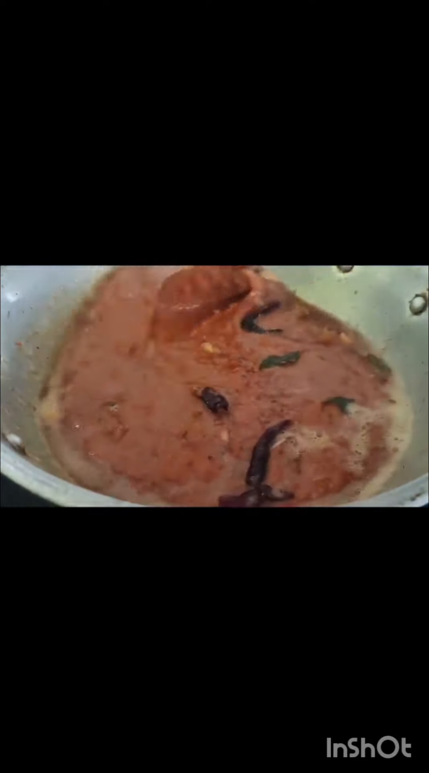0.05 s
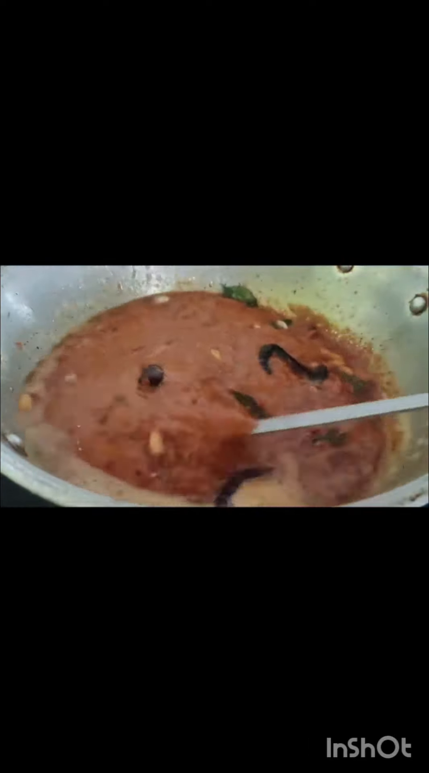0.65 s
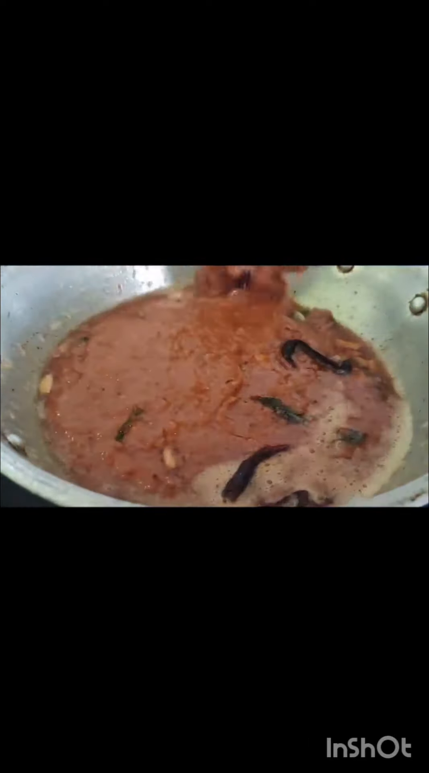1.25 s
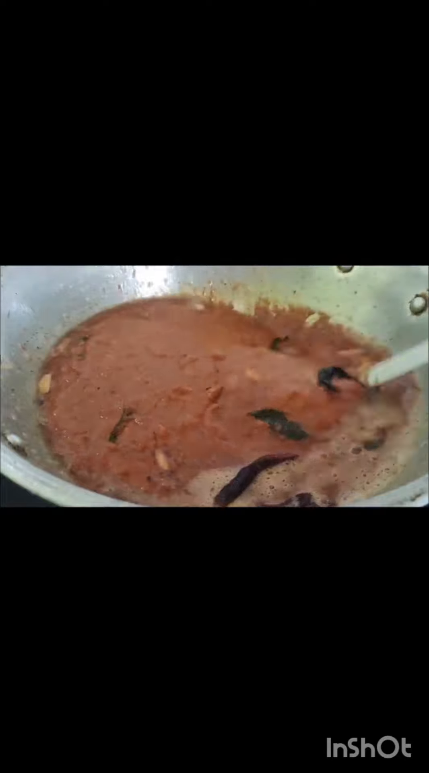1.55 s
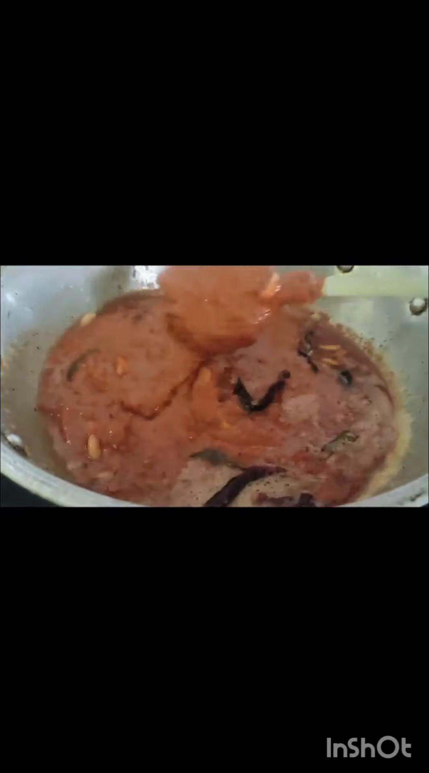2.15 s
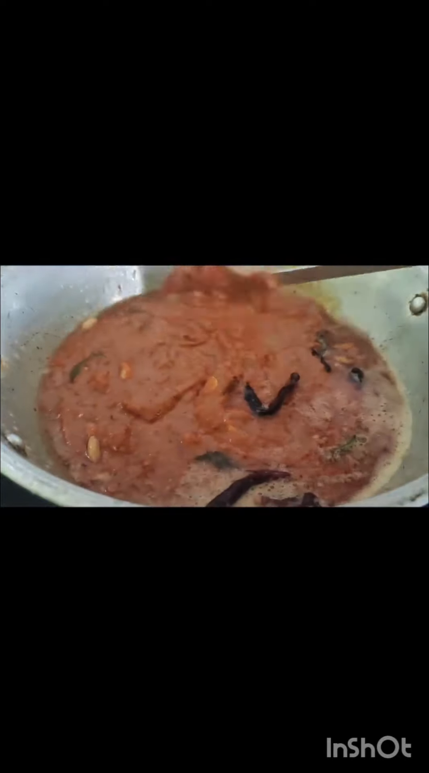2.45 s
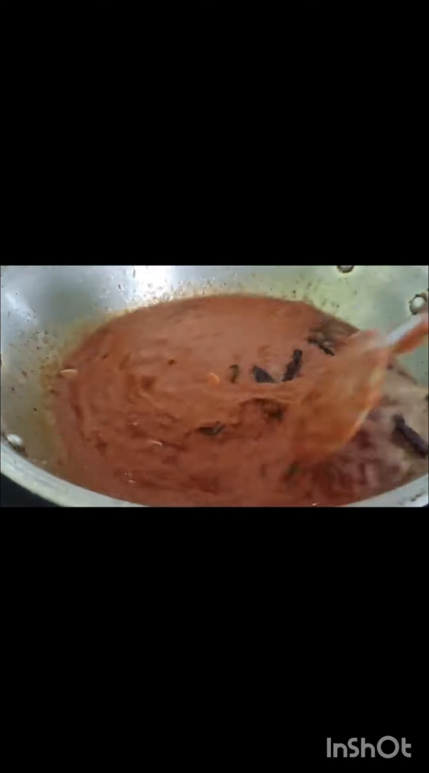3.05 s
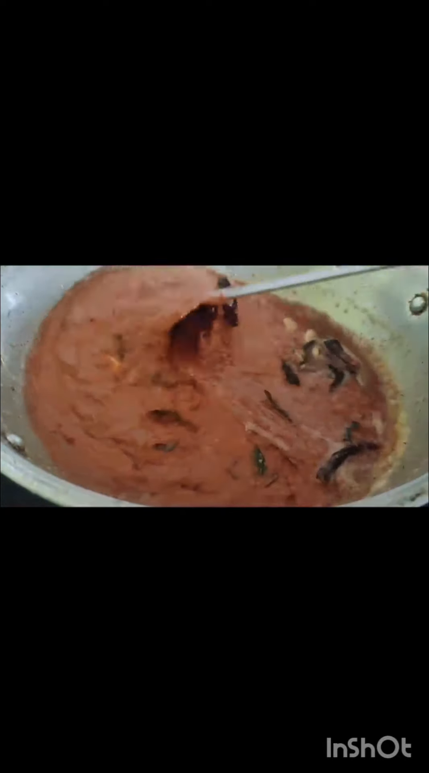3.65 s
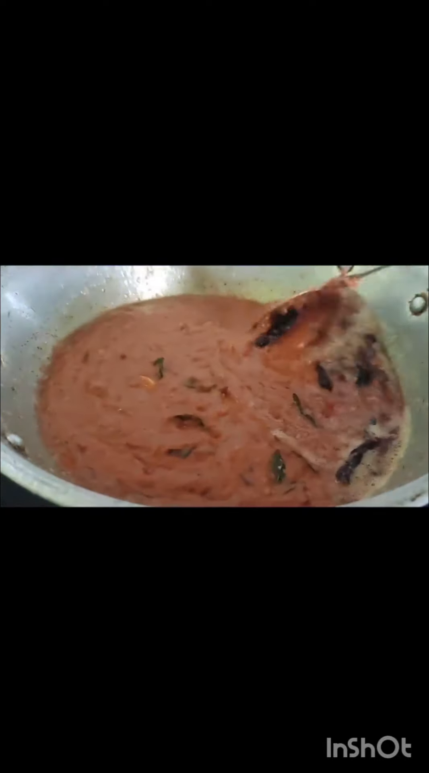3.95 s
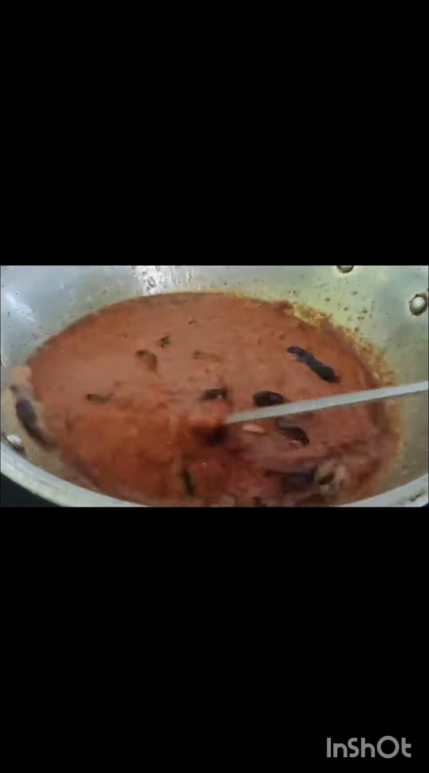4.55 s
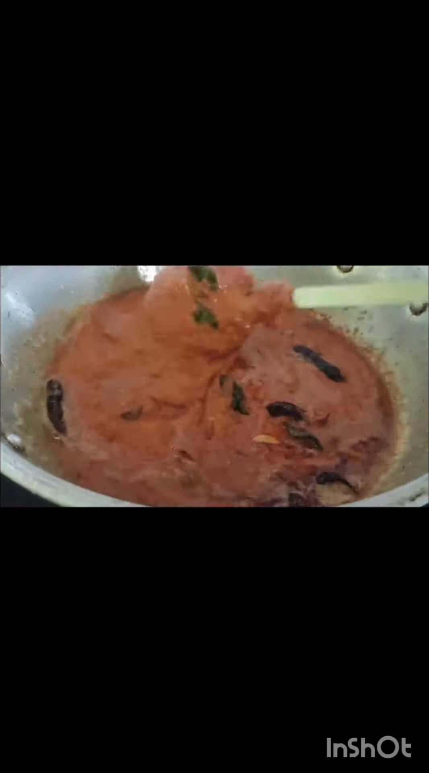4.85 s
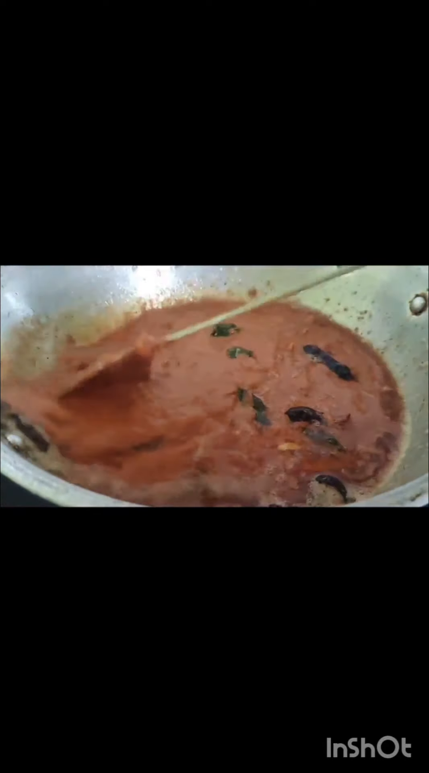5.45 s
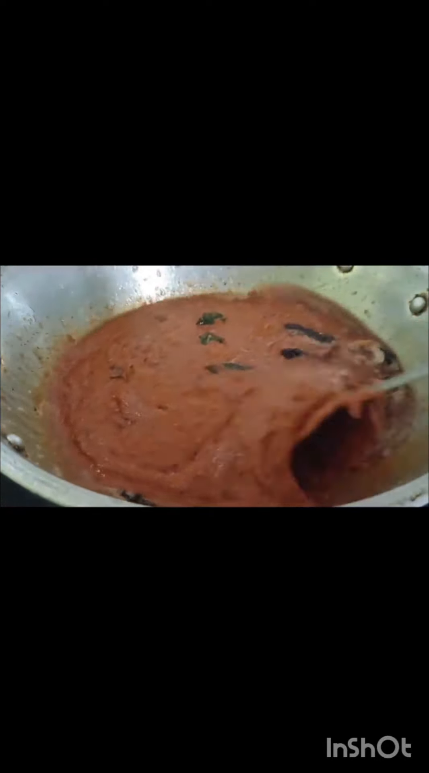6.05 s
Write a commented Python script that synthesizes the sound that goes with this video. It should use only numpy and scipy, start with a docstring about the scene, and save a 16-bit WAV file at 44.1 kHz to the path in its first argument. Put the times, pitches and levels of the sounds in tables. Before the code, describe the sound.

Heard up close in a small, hard-walled kitchen, a metal spatula scrapes and knocks around a pan of thick paste. The first strokes are light and spaced apart. Midway, a bright clink starts a busier run of rasping, bumping and tapping; softer strokes follow, then another sharp clink and scrape. A low, soft stove rush and barely audible bubbling continue throughout.

```python
"""A steel spatula stirs thick paste in a wide metal pan on a stove, in a small kitchen.
The blade scrapes by sticking and slipping; its note falls as it sinks from the bare wall into the paste.
It clinks on bare metal, knocks dully under the paste, and skips over the bottom when pressed hard.
Behind it the stove rushes and hums softly, the paste sizzles faintly and the walls echo the spatula."""
import sys
import numpy as np
from scipy import signal
from scipy.fft import rfft, irfft
from scipy.io import wavfile
from scipy.ndimage import uniform_filter1d

SR = 44100
rng = np.random.default_rng(int(sys.argv[2]) if len(sys.argv) > 2 else 0)


def int16_out(signal):
    """Quantize to a 16-bit WAV file."""
    q = np.round(np.clip(np.atleast_2d(signal).T, -1, 1) * 32767)
    wavfile.write(sys.argv[1], SR, q.astype(np.int16))


N = 277389
TIME = np.arange(N) / SR
TOP_HZ = 14300

# the clear notes of the pan: pitch_hz, level_db, ring_s (time to fade by 60 dB, before damping)
PAN_NOTES = [(274, -14.5, 0.22), (393.4, -5.5, 0.36), (503, -9.5, 0.034), (609, -11.5, 0.31),
             (734, -1, 0.074), (850, -14, 0.042), (1020, 6.5, 0.033), (1190, 4.5, 0.12), (1247, -7, 0.14),
             (1845, -1.5, 0.1), (2094, 3, 0.13), (2453, 0, 0.15), (2620, -2.5, 0.2), (3057, -3.5, 0.21),
             (3700, -1, 0.077), (3830, -12, 0.21), (4730, -9, 0.11), (5230, -10, .11), (6190, -8, 0.088),
             (6720, -1, 0.078), (7370, -4, 0.11), (8780, -15.5, 0.13), (12100, -23, 0.087)]
# the broad resonances of the pan under the paste: pitch_hz, width_hz, level_db
PAN_UNDER_PASTE = [(411, 27, -3), (510.5, 60, 4), (637, 89, 4), (703, 68, 3), (794, 105, 1), (984, 90, 5),
                   (1177, 77, -0.5), (1301, 82, 2), (2100, 42, -8), (2414, 32, -5.5), (3170, 35, -33)]


def scrape():
    """The edge sticks and slips, shaking the pan and the blade, while fine grit hisses."""
    rub, hiss, blade_hz = strokes()
    # the blade rocks as it slides, so its note wobbles, most where it is free of the paste
    wobble = 0.1 * np.clip((blade_hz - 600) / 900, 0.15, 1)
    blade_hz = blade_hz * (1 + wobble * wander(per_s=70))
    judder = wander(per_s=90)
    slips = blend_sides(clicks(per_s=1400, spread_db=1), likeness=0.87) * gain(3.9 * judder)
    pan = normalize(resonances(slips, PAN_UNDER_PASTE)) + gain(9) * normalize(slips)
    # high on the wall the blade sings broadly; deep in the paste it gulps on one low note
    free = even_out(resonate(resonate(pan, blade_hz, width_hz=560), blade_hz, width_hz=800))
    sunk = even_out(resonate(resonate(pan, blade_hz, width_hz=95), blade_hz, width_hz=210))
    depth = np.clip((1000 - blade_hz) / 320, 0, 0.9)
    # some of each slip reaches the pan directly
    direct = even_out(shape_tone(pan, [(200, -16), (380, -8.5), (600, -5), (1350, 2),
                                       (1700, -8), (2900, -20), (4500, -22), (9000, -24)]))
    body = (1 - depth) * free + depth * sunk + gain(-1 - 0.97 * depth) * direct
    return gain(-3.5) * rub * even_out(body, samples=1100) + hiss * grit(judder)


def strokes():
    """Rub, hiss and blade pitch over time: each stroke bites, slides down into the paste and lifts."""
    # strokes of the blade: start_s, length_s, rub_db, rub_change_db, hiss_db, hiss_change_db,
    # landing_hz, sink_s
    moves = [(0, 0.19, -38, -20, -53.5, -10.5, 760, .1), (0.232, 0.048, -30.5, -15.5, -54, 2.5, 860, .2),
             (0.385, 0.35, -48.5, -7, -50, -6.5, 1480, 0.086),
             (1.314, 0.35, -59.5, 4.5, -72.5, 10, 915, .2),
             (1.623, 0.25, -44.5, -8.5, -54, -2, 1660, 0.077),
             (2.444, 0.3, -33, -19, -53, -4.5, 2260, 0.095), (3.03, 0.085, -70, -11, -57.5, -2, 715, .1),
             (3.226, 0.5, -30.5, -8, -39, -13.5, 2280, 0.12), (3.836, 0.17, -39, 5, -53.5, 8, 1480, 0.12),
             (4.062, 0.063, -46, -9.5, -46, -3, 850, 0.12), (4.136, 0.14, -53, 9.5, -53, 0, 2360, 0.31),
             (4.315, 0.07, -39.5, -9.5, -49, -7.5, 1110, 0.33),
             (4.535, 0.023, -56, 4, -54.5, -2, 830, 0.11), (5.15, 0.35, -39, -5.5, -50.5, -2.5, 2020, 0.12),
             (6.011, 0.25, -25.5, -6.5, -38, -4.5, 2060, 0.093)]
    bite_s, sunk_hz = 0.011, 697.0
    rub_fade_db_per_s, hiss_fade_db_per_s = 182, 213
    rub, hiss, blade_hz = np.zeros(N), np.zeros(N), np.full(N, sunk_hz)
    for start_s, length_s, rub_db, rub_change_db, hiss_db, hiss_change_db, landing_hz, sink_s in moves:
        t = np.maximum(TIME - start_s, 0)
        bite = np.minimum(t / bite_s, 1)
        progress = np.minimum(t / length_s, 1)
        lifted_s = np.maximum(t - length_s, 0)
        # paste weighs the blade down: its pitch lingers, then falls to one low note
        pitch_hz = sunk_hz + (landing_hz - sunk_hz) * np.exp(-(t / sink_s) ** 2.08)
        # the higher the blade rings on the bare wall, the less it shakes the pan
        height_db = -2 * np.log2(pitch_hz / sunk_hz)
        rub += bite * gain(rub_db + height_db + rub_change_db * progress - rub_fade_db_per_s * lifted_s)
        hiss += bite * gain(hiss_db + hiss_change_db * progress - hiss_fade_db_per_s * lifted_s)
        blade_hz = np.where(TIME >= start_s, pitch_hz, blade_hz)
    return rub, hiss, blade_hz


def grit(judder):
    """Thousands of tiny slips of the edge make a hiss with a faint ring of metal."""
    # tone of the hiss: pitch_hz, level_db
    hiss_tone = [(300, -70), (900, 1), (2000, 1.5), (3200, -2), (3900, -1.5), (5000, -2), (6200, -1.5),
                 (7600, 0), (8600, -4), (9600, -10), (12000, -9), (14000, -12.5)]
    grains = blend_sides(clicks(per_s=3500, spread_db=-1.5), likeness=0.055)
    metal = resonances(grains, [(hz, 60, db) for hz, db, _ in PAN_NOTES if 1800 < hz < 3200])
    hiss = normalize(shape_tone(grains, hiss_tone)) + gain(-17) * normalize(metal)
    return even_out(patchy(hiss, depth_db=5.5)) * gain(0.91 * judder)


def patchy(x, depth_db):
    """As the edge travels over the metal, its overtones come and go in patches."""
    _, _, spectrum = signal.stft(x, SR, nperseg=512)
    patches = uniform_filter1d(rng.standard_normal(spectrum.shape[1:]), size=3, axis=0)
    patches = normalize(uniform_filter1d(patches, size=9, axis=1))
    return signal.istft(spectrum * gain(depth_db * patches), SR, nperseg=512)[1][:, :N]


def knocks():
    """The blade hits the pan; the more paste under it, the less clang and tick."""
    # hits of the blade: start_s, level_db, thud_db, treble_db, ring_factor
    hits = [(.126, -43.5, -19, -23, .45), (1.273, -36.5, 13.5, -11.5, 0.34), (1.631, -46.5, -7, -8, 0.68),
            (1.739, -44.5, -8, -30, 0.3), (2.45, -27, 0, -4.5, 0.067), (2.516, -35, -22, -14, 0.55),
            (2.562, -36.5, -19, -18, 0.22), (2.967, -41, 6, -14.5, .47), (3.234, -16, -5, 3, 0.4),
            (3.86, -31, -15, -31, 0.64), (3.909, -33, -4, -21, .8), (4.221, -39, 6, -4, 0.4),
            (4.298, -34.5, -11.5, -9, 0.81), (4.31, -35.5, -22, -5.5, 1), (4.469, -49.5, 1, -10, 0.95),
            (5.15, -40.5, 1, -2, 0.15), (6.0069, -16.5, 0.5, 9, 0.62), (6.019, -29, -28, -14, 0.35),
            (6.081, -29.5, -9, -5, 0.74)]
    out = np.zeros((2, N + SR))
    for start_s, level_db, thud_db, treble_db, ring_factor in hits:
        sound = knock(thud_db, clang_db=0.96 * treble_db - 1.5, tick_db=treble_db + 2.24,
                      ring_factor=max(ring_factor, 0.1))
        start = round(start_s * SR)
        out[:, start:start + sound.shape[1]] += gain(level_db) * sound
    return out[:, :N]


def knock(thud_db, clang_db, tick_db, ring_factor, rise_s=0.00068, soak_s=0.0021):
    """One hit: a crack of crowded sheet-metal notes dies fast and leaves the pan's clear notes ringing."""
    # tone of the crack: pitch_hz, level_db
    crack_tone = [(60, -14.5), (200, -23.5), (400, 0), (1100, -3), (2300, 8.5), (3200, 0), (5500, -3.5),
                  (8000, -6), (9300, -14), (12500, -10), (14000, -14.5)]
    t = TIME[:SR // 2]
    pitch_hz, level_db, ring_s = np.transpose(PAN_NOTES)[:, :, None]
    phase = 2 * np.pi * rng.random(pitch_hz.shape)
    phase = phase + 0.96 * rng.standard_normal((2, *pitch_hz.shape))  # different at each ear
    # paste soaks up part of each note at once; the rest rings on
    fade = gain(-60 * t / (ring_s * ring_factor)) + 0.35 * np.exp(-t / soak_s)
    notes = (gain(level_db) * fade * np.sin(2 * np.pi * pitch_hz * t + phase)).sum(1)
    crack_fade = np.exp(-t / (0.002 * ring_factor)) + gain(-13) * np.exp(-t / (0.03 * ring_factor))
    noise = blend_sides(rng.standard_normal((2, len(t))), likeness=0.49)
    crack = shape_tone(noise * crack_fade, crack_tone)
    # the spot that is struck favours some of the crowded notes and misses others
    crowd_hz = np.arange(1400, TOP_HZ, 130)
    favour_db = np.append(0, rng.uniform(-14, 6, len(crowd_hz) - 1))
    crack = shape_tone(crack, np.column_stack([crowd_hz, favour_db]))
    rise = 1 - np.exp(-(t / rise_s) ** 2)
    sound = (normalize(crack) + normalize(notes)) * rise
    # paste between blade and pan cushions the hit and takes away its treble
    cushion = [(280, thud_db), (600, 0), (1300, 0.012),
               (1900, clang_db), (3000, clang_db), (4500, tick_db)]
    sound = shape_tone(sound, cushion)
    return sound / np.sqrt(np.mean(sound[:, :SR // 100] ** 2))  # the first 10 ms set the level


def chatter():
    """Pressed hard, the blade skips in quick uneven bumps that shake the pan under the paste."""
    # runs of bumps on the pan's bottom: start_s, length_s, level_db, pitch_hz, width_hz
    skips = [(.004, 0.013, -38.5, 780, 300), (0.038, 0.039, -39, 770, 298), (0.245, 0.0083, -41, 805, 500),
             (2.71, 0.021, -36.5, 760, 650), (2.969, 0.013, -41, 690, 250), (3.42, 0.016, -29.5, 682, 40),
             (3.467, 0.0095, -33, 703, 40), (3.666, 0.055, -29, 674, 655), (3.739, 0.034, -35.5, 630, 100),
             (3.963, 0.02, -31.5, 1180, 655), (4.001, 0.019, -36, 710, 200),
             (5.441, 0.071, -33.5, 730, 546), (6.232, 0.0076, -30.5, 690, 120)]
    bumps = blend_sides(clicks(per_s=900, spread_db=1), likeness=0.75) * gain(5.7 * wander(per_s=220))
    tone = [(200, -32), (380, -13.5), (500, -0.5), (1300, -0.5), (1700, -1), (2600, -13), (5000, -25)]
    pan = shape_tone(resonances(bumps, PAN_UNDER_PASTE), tone)
    out = np.zeros((2, N))
    for start_s, length_s, level_db, pitch_hz, width_hz in skips:
        inside_s = np.minimum(TIME - start_s, start_s + length_s - TIME)
        force = gain(level_db) * np.clip(inside_s / (0.31 * length_s) + 0.5, 0, 1)
        out += force * even_out(resonate(pan, pitch_hz, width_hz), samples=600)
    return out


def stove_rush():
    """The stove's soft rushing noise, its low part much the same at both ears."""
    # tone of the rush: pitch_hz, level_db
    rush_tone = [(20, 0.5), (35, -6.5), (60, -16), (190, -5), (255, -13.5), (330, -8.5), (520, -12.5),
                 (760, -17), (1150, -17.5), (2000, -23), (4900, -35.5), (7500, -35), (10000, -43),
                 (14000, -38)]
    # how alike left and right are: pitch_hz, likeness (0 to 1)
    likeness = [(30, 0.8), (120, 0.81), (300, 0.83), (700, 0.19), (2000, 0), (8000, 0)]
    hz = np.fft.rfftfreq(N, 1 / SR)
    spectrum = blend_sides(rfft(rng.standard_normal((2, N))), look_up(likeness, hz))
    return gain(-51) * normalize(irfft(spectrum * gain(look_up(rush_tone, hz)), N))


def hum():
    """Narrow bands of noise make a low, wavering hum that swells and sinks."""
    # notes of the hum: pitch_hz, width_hz, level_db, swell_share
    notes = [(66.5, 11, -66, 0.4), (111.4, 4.8, -63.5, 0.071), (153.1, 0.41, -64, 0.98),
             (182, 10.2, -62.5, 0), (331, 44, -59.5, 0.082)]
    # swell of the hum: time_s, level_db
    swell = [(0, -6.5), (1.2, 1), (2.2, -2.5), (2.75, 10), (3.4, 10), (4.4, -2), (6.29, 4)]
    swell_db = np.interp(TIME, *np.transpose(swell))
    out = np.zeros((1, N))
    for pitch_hz, width_hz, level_db, swell_share in notes:
        band = resonate(rng.standard_normal((1, N)), pitch_hz, width_hz)
        band = resonate(band, pitch_hz, 3 * width_hz)
        out += gain(level_db + swell_share * swell_db) * even_out(band, samples=16000)
    return out


def sizzle():
    """Small bubbles burst in the paste."""
    pops = clicks(per_s=110, spread_db=-2.5)
    tone = [(400, -16), (1500, -5.5), (7000, -15), (14000, -14.5)]
    return gain(-74.5) * normalize(shape_tone(pops, tone))


def kitchen(x, echo_db=-3.5):
    """Hard walls close by add a dense echo, different at each ear."""
    # how long the room takes to fade by 60 dB: pitch_hz, fade_s
    fade_times = [(200, 0.92), (1000, 0.27), (4000, 0.39), (8000, 0.4), (14000, 0.25)]
    echoes = rng.standard_normal((2, SR // 2)) * (rng.random((2, SR // 2)) < 4000 / SR)
    echoes[:, :SR // 200] = 0  # nothing comes back in the first 5 ms
    hz, t, spectrum = signal.stft(echoes, SR, nperseg=256)
    fade = gain(-60 * t / look_up(fade_times, hz)[:, None])
    tail = signal.istft(spectrum * fade, SR, nperseg=256)[1]
    return x + gain(echo_db) * signal.fftconvolve(x, tail / np.linalg.norm(tail[0]), axes=1)[:, :N]


def clicks(per_s, spread_db):
    """Tiny clicks of random size, at the same instants on both sides."""
    size = gain(spread_db * np.minimum(rng.exponential(1, N), 4))
    happens = rng.random(N) < per_s / SR
    return size * happens * rng.standard_normal((2, N))


def wander(per_s):
    """A curve that drifts between random values."""
    return normalize(np.interp(TIME * per_s, np.arange(4096), rng.standard_normal(4096)))


def resonate(x, pitch_hz, width_hz):
    """Makes a sound ring around one pitch, which may glide."""
    turn = np.exp(2j * np.pi * np.cumsum(pitch_hz * np.ones(N)) / SR)
    decay = np.exp(-np.pi * width_hz / SR)
    return 2 * (turn * signal.lfilter([1 - decay], [1, -decay], x / turn + 1e-18)).real


def resonances(x, rows):
    """Makes a sound ring at several pitches at once."""
    return sum((-1) ** k * gain(level_db) * np.sqrt(100 / width_hz) * resonate(x, pitch_hz, width_hz)
               for k, (pitch_hz, width_hz, level_db) in enumerate(rows))


def shape_tone(x, points):
    """Filters a sound by rows of pitch_hz, level_db, with no ringing ahead of it."""
    log_gain = np.log(gain(look_up(points, abs(np.fft.fftfreq(4096, 1 / SR)))))
    taps = np.fft.ifft(np.exp(np.conj(signal.hilbert(log_gain)))).real[:2048]
    return signal.oaconvolve(x, taps[None], axes=1)[:, :x.shape[1]]


def blend_sides(x, likeness):
    """Mixes left and right: 0 keeps them apart, 1 makes them the same."""
    angle = np.arcsin(np.clip(likeness, 0, 1)) / 2
    return np.cos(angle) * x + np.sin(angle) * x[::-1]


def even_out(x, samples=1800):
    """Evens out slow changes of level and keeps the grain."""
    return x / np.sqrt(abs(uniform_filter1d((x ** 2).mean(0), samples)) + 1e-12)


def look_up(points, hz):
    """Reads between a table's rows, with octaves evenly spaced."""
    pitch_hz, value = np.transpose(points)
    return np.interp(np.log(hz + 1), np.log(pitch_hz + 1), value)


def normalize(x):
    """Scales to an average power of 1."""
    return x / np.sqrt(np.mean(x ** 2) + 1e-20)


def gain(db):
    """Turns decibels into a multiplier."""
    return 10 ** (np.asarray(db) / 20)


def scene():
    """Spatula and pan in the kitchen, over the stove."""
    return kitchen(scrape() + chatter()) + kitchen(knocks()) + stove_rush() + hum() + sizzle()


def record(dry):
    """Cuts the treble above TOP_HZ."""
    low_pass = signal.firwin(401, TOP_HZ, window=("kaiser", 8), fs=SR)
    return signal.oaconvolve(dry, low_pass[None], "same")


dry = scene()
out = record(dry)
int16_out(out)
```